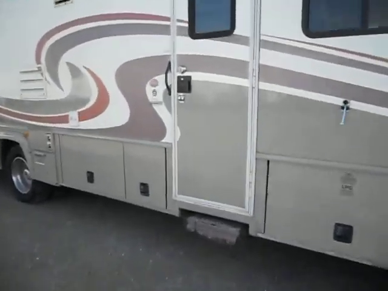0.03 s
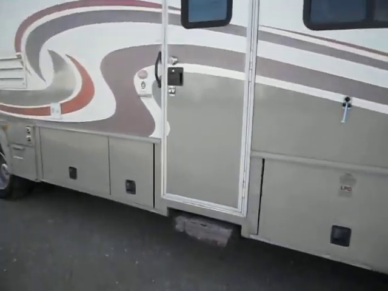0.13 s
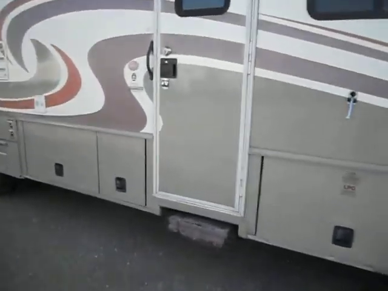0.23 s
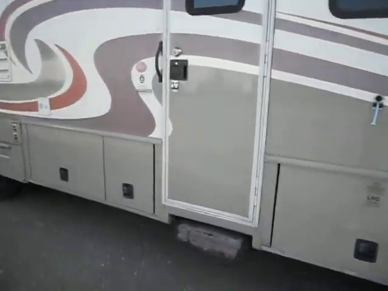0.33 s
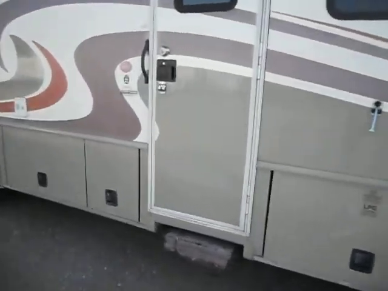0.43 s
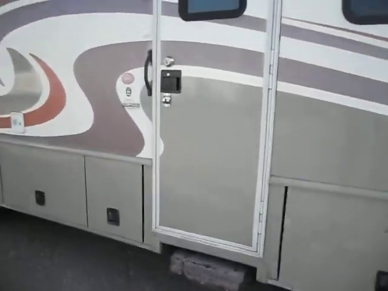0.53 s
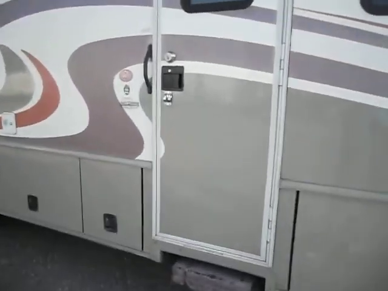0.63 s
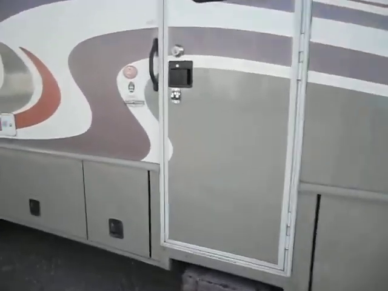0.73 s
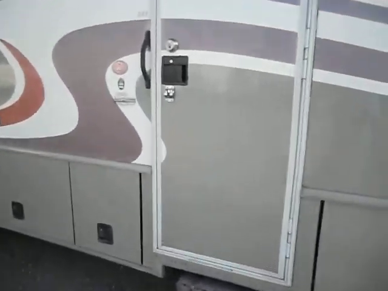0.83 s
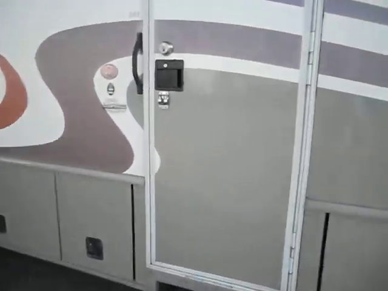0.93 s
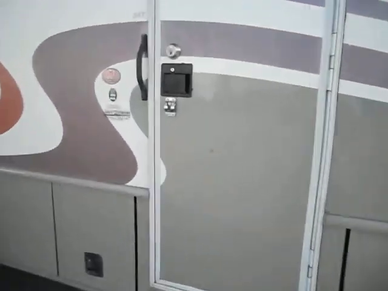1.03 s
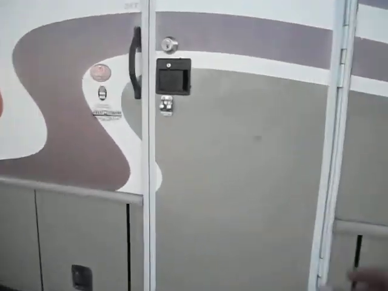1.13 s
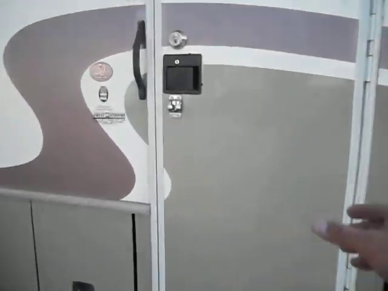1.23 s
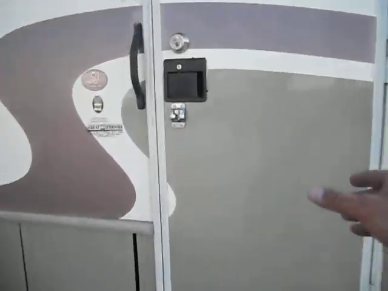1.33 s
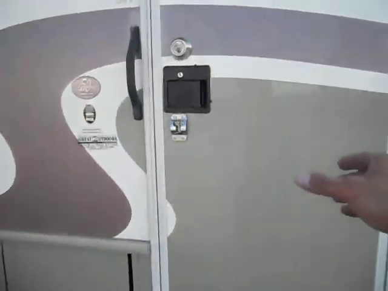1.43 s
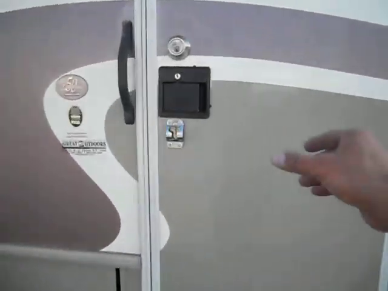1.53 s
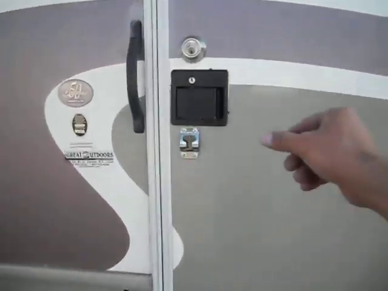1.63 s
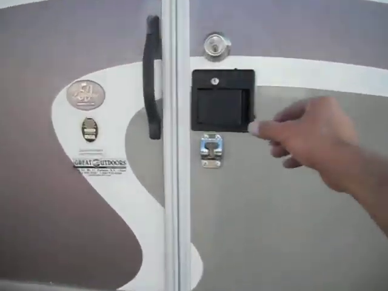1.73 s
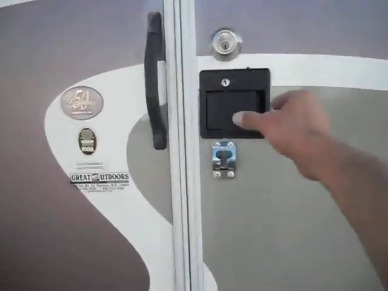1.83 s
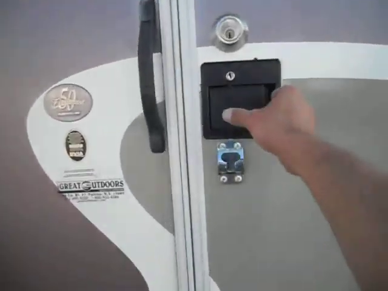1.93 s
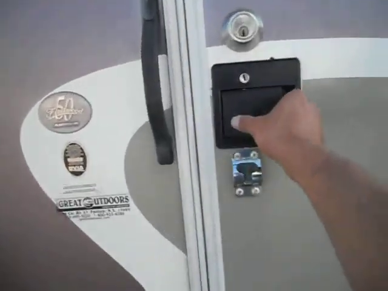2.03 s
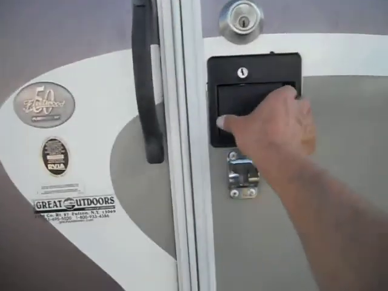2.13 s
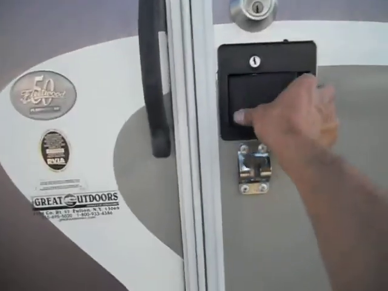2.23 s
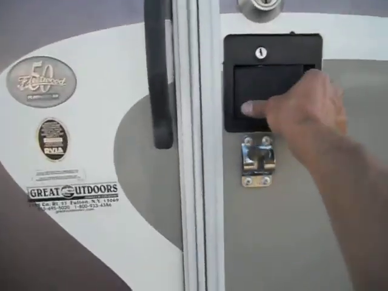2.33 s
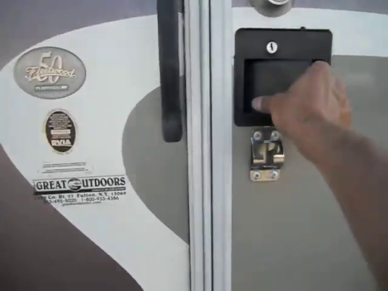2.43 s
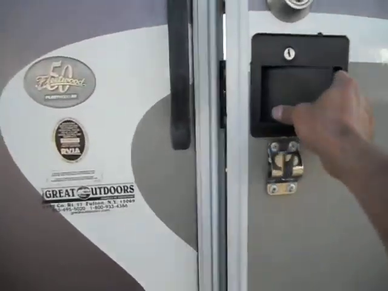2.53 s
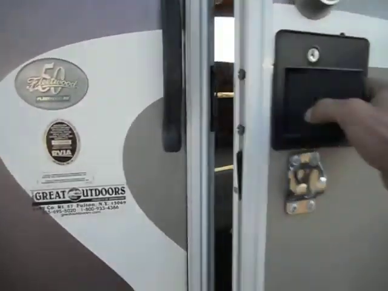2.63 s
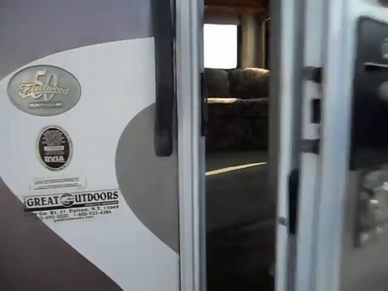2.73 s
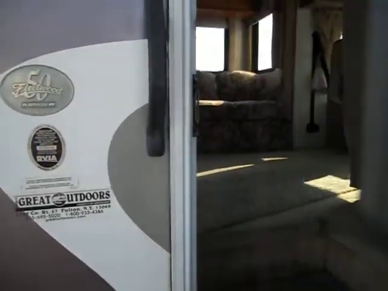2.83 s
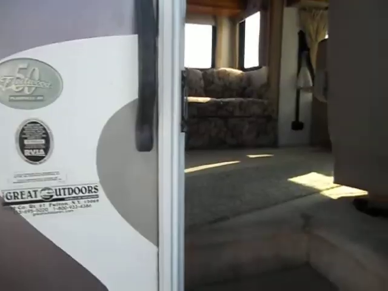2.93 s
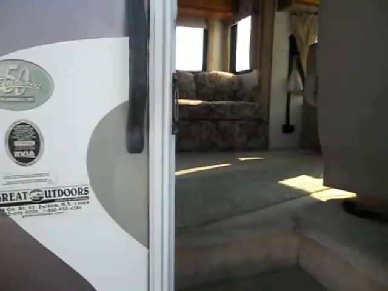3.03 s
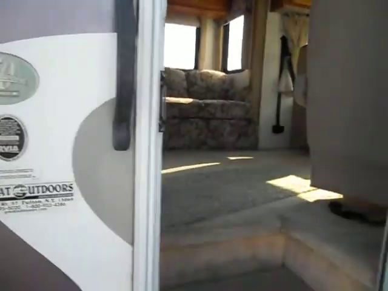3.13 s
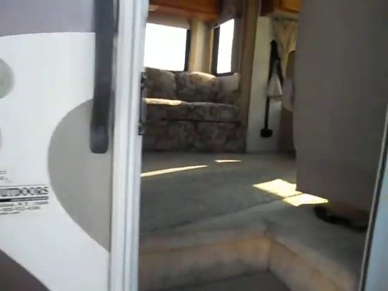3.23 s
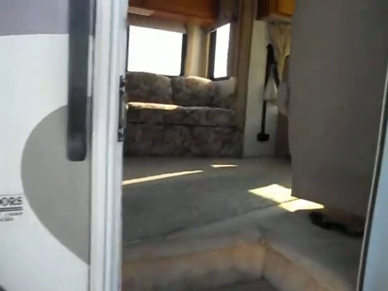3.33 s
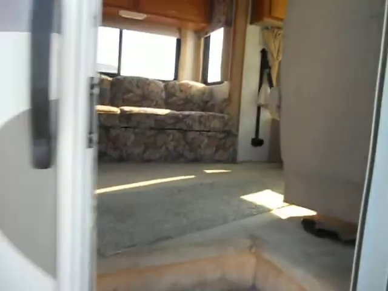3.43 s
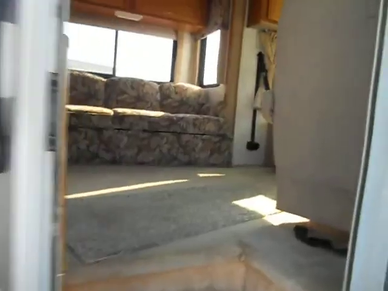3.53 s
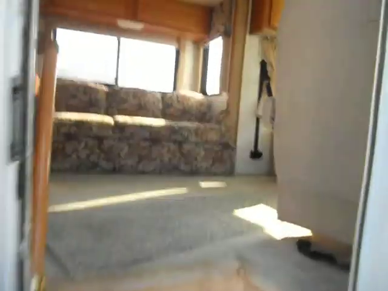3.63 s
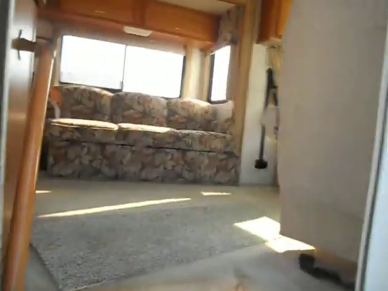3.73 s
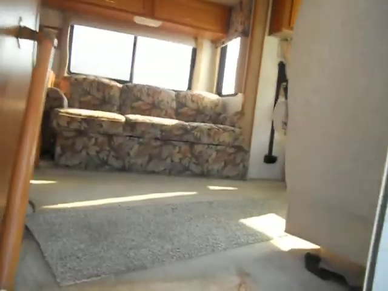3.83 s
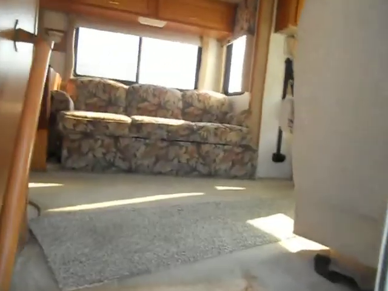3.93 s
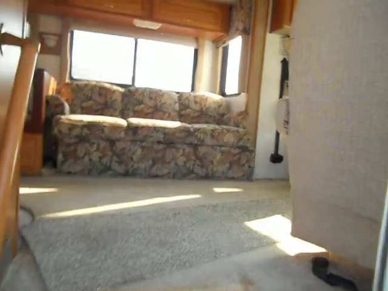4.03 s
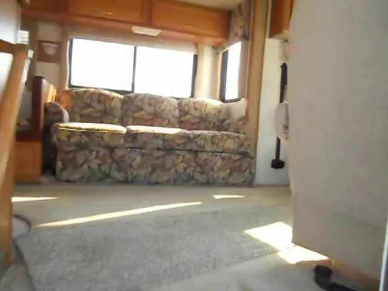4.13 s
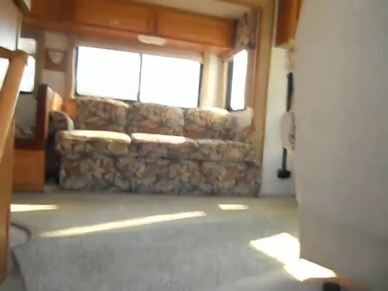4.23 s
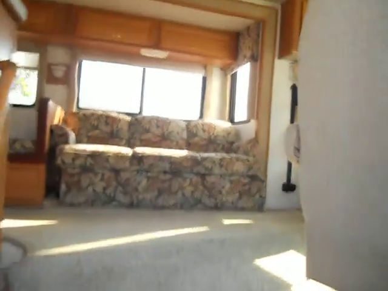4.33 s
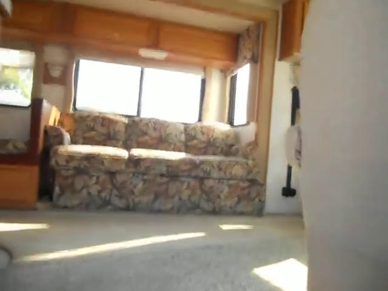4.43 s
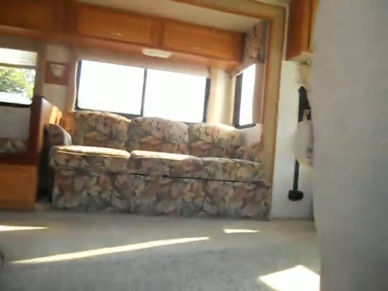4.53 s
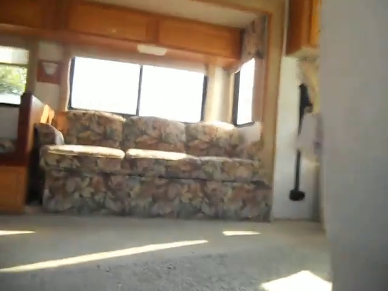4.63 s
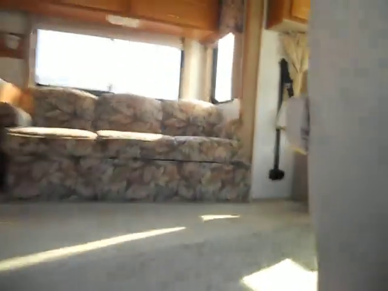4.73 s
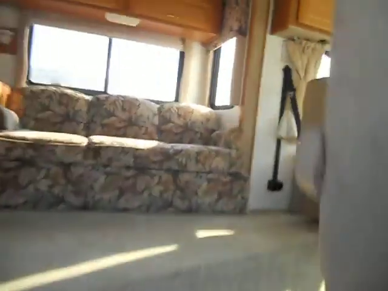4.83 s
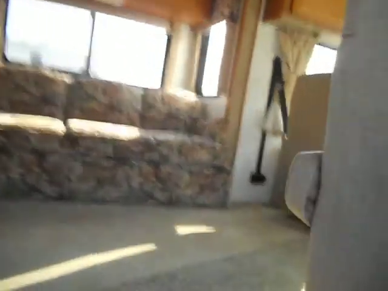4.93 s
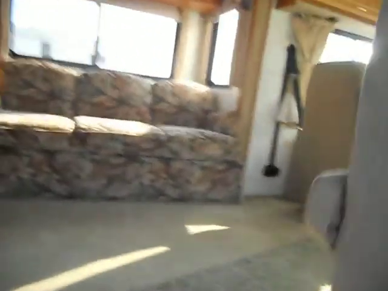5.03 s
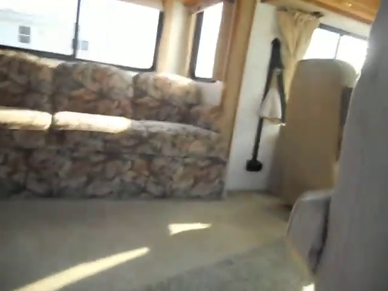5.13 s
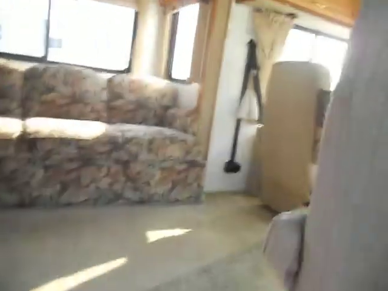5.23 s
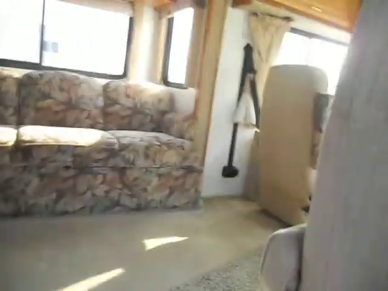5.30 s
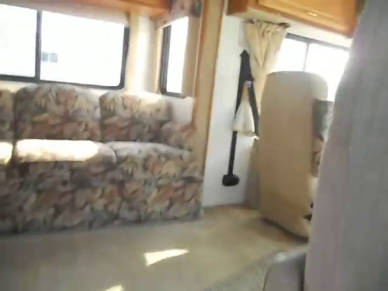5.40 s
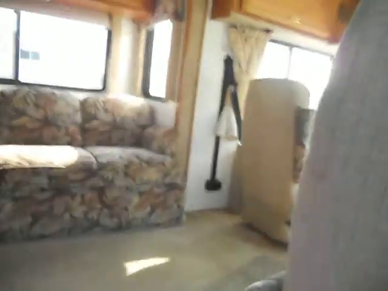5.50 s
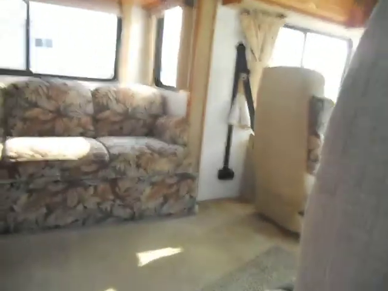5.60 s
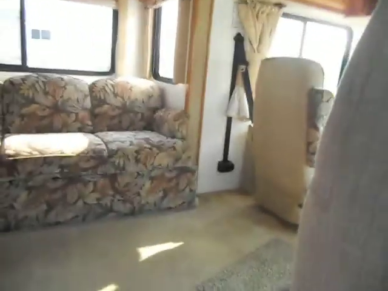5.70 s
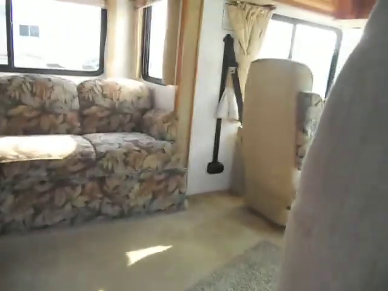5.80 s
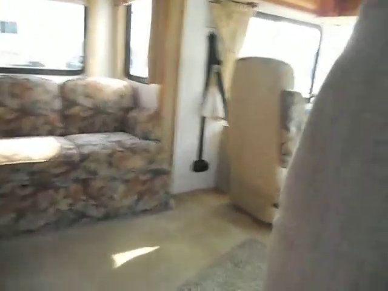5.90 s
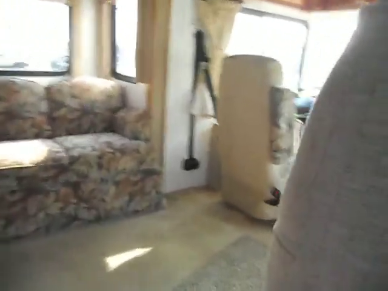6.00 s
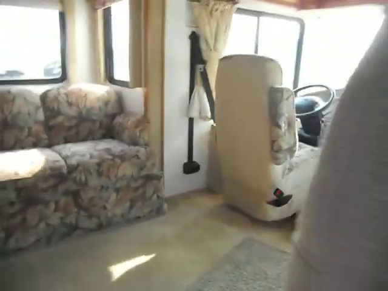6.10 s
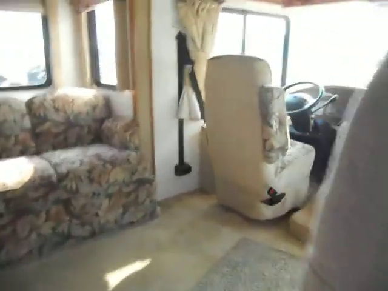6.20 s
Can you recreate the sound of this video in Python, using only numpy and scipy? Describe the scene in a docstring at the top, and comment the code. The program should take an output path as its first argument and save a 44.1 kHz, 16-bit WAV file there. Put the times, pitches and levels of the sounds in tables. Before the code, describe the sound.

Outdoors, a large vehicle idles with low throbbing rumble, fan rush and hiss, getting louder as someone scuffs up on asphalt. A paddle latch clicks and snaps hard, the sound drops suddenly, then a second clack and a springy rattle follow. The background climbs back as shoes knock on the steps and small squeaks sound inside the cabin, all through a small handheld camera microphone.

```python
"""A motorhome engine idles: exhaust tones, body rumble and fan rush, under airy hiss and light wind noise.
Someone scuffs up to it, pulls the paddle latch (clicks, a dragging bolt, a spring), swings the door and climbs in.
The loudest latch blows make the camera's gain control duck everything, then let it climb back.
Squeaks are short gliding tones, knocks and thuds are struck modes, scuffs and rubbing swells are grainy noise."""
import sys
import numpy as np
from scipy import signal
from scipy.fft import rfft, irfft, next_fast_len
from scipy.io import wavfile
from scipy.ndimage import uniform_filter1d, minimum_filter1d

SR = 44100
rng = np.random.default_rng(int(sys.argv[2]) if len(sys.argv) > 2 else 0)


def pcm_store(signal):
    """Save signal as 16-bit PCM."""
    levels = np.round(np.clip(np.atleast_2d(signal), -1, 1) * 32767)
    wavfile.write(sys.argv[1], SR, levels.astype(np.int16).T)


N = 276066

# Engine speed: t/s, firing rate f/Hz
FIRING = [(0, 33.5), (1.0, 33.1), (1.5, 33.5), (2.0, 33.8), (3.5, 33.4), (4.2, 33.7), (4.9, 33.0),
          (6.26, 33.2)]
# Exhaust tones at 1, 2, 3 .. times the firing rate: level/dB
EXHAUST = [-17.5, -2.5, -4, -2, -12]
# Body booms and fan tones, as noise resonances: f/Hz, half width/Hz, level/dB
BOOMS = [(148.7, 6.7, -5), (217, 20, -3), (277.4, 37, -5)]
FAN_TONES = [(964.7, 14, -9.5), (1220, 40, -14), (1464, 40, -10.5)]
# Noise colours of engine rumble, fan rush and hiss (relative): f/Hz, level/dB
RUMBLE = [(12, -3), (22, 2), (45, -5), (85, -1), (130, -5), (190, -4), (260, -4.5), (350, -2), (500, -6),
          (700, -13), (1100, -34)]
RUSH = [(300, -30), (550, -3), (750, 0), (1100, 0), (1480, -3), (1650, -6), (1900, -9.5), (2300, -18),
        (4000, -28)]
HISS_OUTSIDE = [(1180, -27), (2000, -2.5), (2340, -9.5), (2930, -5), (4030, -5.5), (5120, -12.5),
                (7110, -13), (9730, -18), (10300, -23.5), (11900, -28.5), (15500, -73), (22000, -120)]
HISS_INSIDE = [(1180, -20), (2000, -2), (2390, -5), (2580, -5), (3320, -8.5), (3740, -6.5), (4820, -8.5),
               (9800, -13.5), (10400, -20.5), (11900, -24), (15500, -67), (22000, -120)]
# Noise colours of low grit and airy rubbing (relative): f/Hz, level/dB
GRIT = [(150, -15), (300, 5), (800, 8.5), (1500, 8), (2200, -6.5), (4200, -12.5), (6000, -15.5),
        (11000, -35)]
RUBBING = [(800, -16), (2000, 9), (4000, 3.5), (5100, 2.5), (5800, 3), (6600, 1), (8000, -5), (11000, -31)]
# Engine loudness on the walk to the door, then in the cabin: t/s, level/dB
APPROACH = [(0.0, -34.5), (0.58, -26), (1.69, -19.5), (2.14, -21.5)]
CABIN = [(3.8, -25), (4.05, -23.5), (4.86, -29.5), (5.17, -26.5), (5.67, -31), (6.04, -28)]
# Each layer against the engine loudness: first level/dB, walk change/dB, door change/dB, cabin change/dB
HUM_PATH = (0, -0.46, 0, 1)
RUMBLE_PATH = (2.5, -8.5, -3, -0.5)
RUSH_PATH = (3, -12, -7, -2.5)
HISS_PATH = (-5.5, -13.5, -2, 1.5)
# The walk leaves the vehicle's front behind; later the cabin closes in; the opening door screens briefly
WALK_S, ENTER_S, INSIDE_S = 1.9, 3.5, 4.9
SCREEN_S, SCREEN_SPREAD_S = 2.72, 0.22

# Shoes scuffing asphalt, and two soft swells of low grainy noise: t/s, level/dB, bell spread/s
GRITTY_SWELLS = [(.12, -25, 0.023), (.63, -28, 0.024), (1.16, -21.5, 0.036), (1.215, -18.5, 0.0065),
                 (1.785, -26.5, 0.036), (3.5, -31, 0.088), (6.2, -36, 0.08)]
# Soft swells of airy, rubbing hiss, the first long, the others short: t/s, level/dB, bell spread/s
RUBBING_SWELLS = [(3.22, -42.5, 0.29), (4.02, -40.5, 0.085), (4.68, -42, 0.04), (5.25, -39.5, 0.097)]
# A sleeve sliding along seat fabric: t/s, level/dB, bell spread/s
SLIDES = [(5.255, -46, 0.053), (5.40, -49, 0.029)]
# Shoes and hands on ground, steps and door frame: t/s, level/dB, pivot f/Hz, fall/dB per octave off pivot
KNOCKS = [(1.181, -32, 1200, 9.5), (1.733, -21.5, 800, 12), (1.801, -16, 1120, 33),
          (3.434, -23.5, 4234, 34.5), (3.597, -17.5, 2770, 11), (3.745, -26.5, 985, 14),
          (4.102, -12, 1020, 6), (4.170, -26, 890, 12), (4.437, -25, 2160, 10), (4.537, -39.5, 3560, 11),
          (5.297, -19.5, 900, 6.5), (5.452, -31, 1300, 12)]
KNOCK_T60_S = 0.022
# Each knock settles with a second, softer and duller contact
SETTLE_S, SETTLE_LOSS_DB, SETTLE_PITCH_RATIO, SETTLE_T60_S = 0.009, 5.5, 0.8, 0.031
SETTLE_FALL_DB = 15  # per octave
# Ringing modes of steps and frame (relative): f/Hz, level/dB
FRAME_MODES = [(390, 17), (660, -4), (1020, 4.5), (1400, -3.5), (1850, 7), (2300, 3.5), (2750, -14),
               (3350, 1), (3700, -17), (4400, -1), (5550, 5), (7400, 6)]

# Paddle and latch clicks: t/s, level/dB, pivot f/Hz, fall/dB per octave off pivot, crack t60/s
CLICKS = [(1.614, -29, 7700, 12, .016), (2.173, 9.5, 1280, 13, 0.0063), (2.175, -1, 6940, 1, 0.059),
          (2.803, -5, 8150, 4, 0.015), (2.833, -4, 2960, 32, 0.021), (2.835, -3.5, 8150, 41, 0.027),
          (2.845, -1.5, 5070, -0.5, 0.057), (2.991, -23, 5000, -0.5, .02), (3.025, -26, 4430, 5, .04)]
# Ringing modes of the door (relative): f/Hz, level/dB
DOOR_MODES = [(680, -10), (797, -7), (1120, 2), (1270, -2), (1610, 0), (2875, -7), (3160, -8), (3520, 0),
              (3870, 1), (4260, -4), (4740, -11), (5400, -8), (5550, -6), (5905, -2), (6135, -4),
              (6340, -7), (6590, -2), (6760, -6), (6880, -7), (7170, -6), (7525, -3), (8200, -8),
              (10100, -11)]
# The bolt grips, slips over the strike plate and snaps free:
# t/s, level/dB, pivot f/Hz, fall/dB per octave off pivot
BOLT_GRIPS = (2.384, 3, 1400, 16)
BOLT_SLIPS = (2.393, 11, 2930, 1.9)
BOLT_SNAPS = (2.396, 20, 8000, .5)
BOLT_T60_S = 0.011
REBOUND_S, REBOUND_LOSS_DB, REBOUND_T60_S = 0.009, 19.5, 0.031
# Dull thuds of door panel and floor: t/s, level/dB, f/Hz, t60/s
THUDS = [(2.401, 9, 120, 0.066), (2.401, 4.5, 400, 0.059), (2.844, -16, 195, 0.16),
         (4.105, -11, 393, 0.067), (5.299, 3.5, 237, 0.025), (5.349, 0, 170, 0.0155),
         (6.074, -12.5, 132, 0.18)]
# Stick-slip squeaks of latch, hinge and step:
# t/s, length/s, start f/Hz, end f/Hz, level/dB, step per overtone/dB, roughness
SQUEAKS = [(2.81, 0.037, 3700, 3420, -6, -13, .25), (3.579, 0.022, 2840, 2660, -30, -19, 0.81),
           (3.674, 0.032, 1950, 1970, -27, -7, 0.5), (3.942, 0.032, 2360, 2500, -34, -25, 0.75),
           (4.646, 0.034, 2560, 2520, -42, -18, 1.8)]
# Ringing modes of the latch spring (relative): f/Hz, level/dB, t60/s
SPRING_MODES = [(4043, -19, .14), (6605, -24, .16), (7170, 0, .14), (10430, -13, .15), (11650, -11, .14)]
# The released paddle rattles to rest
RATTLE_S, RATTLE_GAP_S, RATTLE_DB, RATTLE_LOSS_DB = 2.884, 0.016, -18.5, 4
RATTLE_HZ, RATTLE_FALL_DB, RATTLE_T60_S = 4000, 1, 0.043

CUTOFF_HZ = 12100  # top of the camera's sound


def from_db(db):
    """Decibels to gain."""
    return 10 ** (np.asarray(db) / 20)


def rms_one(x):
    """Scale to rms 1."""
    return x / np.sqrt(np.mean(x ** 2) + 1e-20)


def in_time(rows):
    """Each column of a curve, drawn out to every sample."""
    s, *columns = np.transpose(rows)
    return [np.interp(np.arange(N) / SR, s, column) for column in columns]


def add(out, s, sound):
    """Mix a short sound in at time s."""
    i = round(s * SR)
    out[i:i + len(sound)] += sound[:N - i]


def filtered_noise(gain_at):
    """Noise whose amplitude follows a function of frequency; rms 1."""
    size = next_fast_len(N)
    hz = np.maximum(np.arange(size // 2 + 1) * SR / size, 1)
    spectrum = rfft(rng.standard_normal(size)) * gain_at(hz)
    return rms_one(irfft(spectrum, size)[:N])


def noise(colour):
    """Noise of a given colour, silent beyond its ends."""
    f, db = np.transpose(colour)
    return filtered_noise(lambda hz: np.interp(np.log(hz), np.log(f), from_db(db), left=0, right=0))


def drift(rate_hz):
    """Random wander of rms 1, mostly slower than the given rate."""
    return filtered_noise(lambda hz: 1 / (1 + (hz / rate_hz) ** 2))


def resonances(rows):
    """Turbulence ringing in narrow resonances."""
    out = np.zeros(N)
    for f, half_width, db in rows:
        out += from_db(db) * filtered_noise(lambda hz: 1 / (1 + ((hz - f) / half_width) ** 2))
    return out


def ring(t, hz, t60):
    """A struck mode: a sine dying by 60 dB in t60 seconds."""
    return np.sin(2 * np.pi * hz * t) * from_db(-60 * t / t60)


def swells(rows):
    """A bell-shaped rise and fall of level for each stroke."""
    t = np.arange(N) / SR
    return sum(from_db(db) * np.exp(-0.5 * ((t - s) / spread) ** 2) for s, db, spread in rows)


def heard_db(path):
    """A layer's level along the way: the engine's loudness, shaded by vehicle side, door and cabin walls."""
    t = np.arange(N) / SR
    engine_db, = in_time(list(APPROACH) + list(CABIN))
    first_db, walk_db, door_db, cabin_db = path
    walked = np.clip(t / WALK_S, 0, 1)
    screened = np.exp(-0.5 * ((t - SCREEN_S) / SCREEN_SPREAD_S) ** 2)
    entered = np.clip((t - ENTER_S) / (INSIDE_S - ENTER_S), 0, 1)
    return engine_db + first_db + walk_db * walked + door_db * screened + cabin_db * entered


def blows(rows, body, ring_db, ring_t60, tail_db, tail_t60, contact_cycles, hollow_db,
          hollow_hz=2100, strike_s=0.002):
    """Each blow is a noise crack plus the body's modes; a higher pivot frequency builds up faster."""
    out, t = np.zeros(N), np.arange(SR // 4) / SR
    edges = np.geomspace(200, 12000, 17)
    centres = np.sqrt(edges[1:] * edges[:-1])
    bands = []
    for edge_pair in zip(edges, edges[1:]):
        band_filter = signal.butter(2, edge_pair, "band", fs=SR, output="sos")
        bands.append(rms_one(signal.sosfilt(band_filter, rng.standard_normal(N))))
    bands = np.array(bands)
    # the crack is shaped by a gap around hollow_hz
    hollow = from_db(hollow_db * np.exp(-10 * np.log2(centres / hollow_hz) ** 2))

    def even(x):
        """Scale to rms 1 over the strike."""
        return x / np.sqrt(np.mean(x[t < strike_s] ** 2))

    for s, db, pivot_hz, fall_db, t60 in rows:
        weight = lambda hz: from_db(-fall_db * np.abs(np.log2(hz / pivot_hz)))
        dying = from_db(-60 * t / t60) + from_db(tail_db - 60 * t / tail_t60)
        start = round(s * SR)
        crack = (hollow * weight(centres)) @ bands[:, start:start + len(t)] * dying
        modes = np.zeros(len(t))
        for hz, level_db in body:
            modes += rng.choice([-1, 1]) * from_db(level_db) * weight(hz) * ring(t, hz, ring_t60)
        contact = 1 - np.exp(-t * pivot_hz / contact_cycles)
        blow = contact * (even(crack) + from_db(ring_db) * even(modes))
        add(out, s, from_db(db) * even(blow))
    return out


def engine(hum_db, rumble_db, rush_db, wobble=0.0032, waver_db=0.24, throb=0.097):
    """Exhaust tones, a booming body, and the fan's rush throbbing at twice the firing rate."""
    firing_hz = in_time(FIRING)[0] * (1 + wobble * drift(6.5))
    phase = 2 * np.pi * np.cumsum(firing_hz) / SR
    hum = np.zeros(N)
    for k, db in enumerate(EXHAUST, start=1):
        hum += from_db(db + waver_db * drift(2.4)) * np.sin(k * phase + rng.uniform(0, 2 * np.pi))
    rumble = noise(RUMBLE) * from_db(1.7 * drift(25)) + from_db(-1.0) * resonances(BOOMS)
    rush = from_db(0.33) * noise(RUSH) + from_db(0.5) * resonances(FAN_TONES)
    rush *= 1 + throb * np.sin(2 * phase)
    flickering_rush_db = rush_db + 0.37 * drift(42)
    return from_db(hum_db) * hum + from_db(rumble_db) * rumble + from_db(flickering_rush_db) * rush


def air(hiss_db, doorway_s=2.77, flutter_db=0.86):
    """Fluttering hiss crossfades from its outdoor to its indoor colour over a second at the doorway."""
    inside = np.clip(np.arange(N) / SR - doorway_s, 0, 1)
    hiss = np.sqrt(1 - inside) * noise(HISS_OUTSIDE) + np.sqrt(inside) * noise(HISS_INSIDE)
    return from_db(hiss_db + flutter_db * drift(25)) * hiss


def wind(rumble_db, per_s=10, eddy_s=0.00045, puff_db=6, shelter_s=3.3):
    """Eddies hit the microphone as brief dips of pressure, until the vehicle gives shelter."""
    t = np.arange(N) / SR
    arrivals = rng.random(N) < per_s / SR
    eddies = arrivals * rng.uniform(0.17, 1.8, N) * (t < shelter_s)
    age = t[:SR // 20] / eddy_s
    puff = age ** 2 * np.exp(2 - age) / 2 ** 2  # peaks at 1
    return -from_db(rumble_db + puff_db) * signal.fftconvolve(eddies, puff)[:N]


def scuffs_and_rubbing(grit_db=4.0, rub_db=0.0, weave_hz=5750, weave_half_width_hz=380):
    """Low gritty noise in uneven grains, airy rubbing hiss, and a sleeve sliding with a narrow hiss."""
    gritty = swells(GRITTY_SWELLS) * rms_one(noise(GRIT) * from_db(grit_db * drift(150)))
    rubbing = swells(RUBBING_SWELLS) * rms_one(noise(RUBBING) * from_db(rub_db * drift(200)))
    sleeve = swells(SLIDES) * resonances([(weave_hz, weave_half_width_hz, 0)])
    return gritty + rubbing + sleeve


def landings():
    """Contacts of shoes and hands: each lands, then settles."""
    first = [(*knock, KNOCK_T60_S) for knock in KNOCKS]
    second = [(s + SETTLE_S, db - SETTLE_LOSS_DB, hz * SETTLE_PITCH_RATIO, SETTLE_FALL_DB, SETTLE_T60_S)
              for s, db, hz, _ in KNOCKS]
    return first + second


def knocks():
    """Shoes and hands strike the modes of steps and frame."""
    return blows(landings(), FRAME_MODES, ring_db=-2.0, ring_t60=0.028, tail_db=-24, tail_t60=0.076,
                 contact_cycles=0.76, hollow_db=-7.5)


def latch():
    """Paddle, bolt and rattle contacts strike the modes of the door."""
    contacts = list(CLICKS) + bolt() + rattle()
    return blows(contacts, DOOR_MODES, ring_db=1.0, ring_t60=0.016, tail_db=-26.0, tail_t60=0.086,
                 contact_cycles=3.0, hollow_db=-9.5)


def door_swing(middle_s=2.56, swing_db=-20, spread_s=0.33, top_hz=150):
    """The freed door shudders and pushes air past the microphone: a swell of low noise."""
    push = filtered_noise(lambda hz: hz / (hz + 10) / (1 + (hz / top_hz) ** 4))
    return swells([(middle_s, swing_db, spread_s)]) * push


def bolt(count=4):
    """Contacts of the bolt: a quick run of ever louder, brighter slips, the snap and one rebound."""
    s, db, hz, fall_db = BOLT_SNAPS
    slips = [(*slip, BOLT_T60_S) for slip in np.linspace(BOLT_GRIPS, BOLT_SLIPS, count)]
    snap = (s, db, hz, fall_db, BOLT_T60_S)
    rebound = (s + REBOUND_S, db - REBOUND_LOSS_DB, hz, fall_db, REBOUND_T60_S)
    return slips + [snap, rebound]


def thuds(contact_s=0.0018):
    """Soft contacts wake one low mode of a panel."""
    out, t = np.zeros(N), np.arange(SR // 3) / SR
    for s, db, hz, t60 in THUDS:
        add(out, s, -from_db(db) * ring(t, hz, t60) * (1 - np.exp(-t / contact_s)))
    return out


def squeaks(count=3):
    """Dry surfaces slip in a short tone with overtones; a rough slip wavers in pitch and strength."""
    out, waver, grip = np.zeros(N), drift(370), drift(230)
    for s, length, start_hz, end_hz, db, overtone_db, rough in SQUEAKS:
        size, i = round(length * SR), round(s * SR)
        hz = np.linspace(start_hz, end_hz, size) * (1 + 0.03 * rough * waver[i:i + size])
        phase = 2 * np.pi * np.cumsum(hz) / SR
        strength = np.hanning(size) * (1 + 0.5 * rough * grip[i:i + size])
        tone = sum(from_db(db + k * overtone_db) * np.sin((k + 1) * phase) for k in range(count))
        add(out, s, strength * tone)
    return out


def spring(released_s=2.845, ping_db=-2.5):
    """The latch snaps back and its spring pings in several modes."""
    out, t = np.zeros(N), np.arange(SR // 2) / SR
    ping = sum(from_db(ping_db + db) * ring(t, hz, t60) for hz, db, t60 in SPRING_MODES)
    add(out, released_s, ping)
    return out


def rattle(count=3):
    """Contacts of the loose paddle, each weaker than the last."""
    return [(RATTLE_S + k * RATTLE_GAP_S, RATTLE_DB - k * RATTLE_LOSS_DB,
             RATTLE_HZ, RATTLE_FALL_DB, RATTLE_T60_S) for k in range(count)]


def scene():
    """Everything as it reaches the microphone."""
    rumble_db = heard_db(RUMBLE_PATH)
    idling = engine(heard_db(HUM_PATH), rumble_db, heard_db(RUSH_PATH))
    background = idling + air(heard_db(HISS_PATH)) + wind(rumble_db)
    contacts = scuffs_and_rubbing() + knocks()
    door = latch() + door_swing() + thuds() + squeaks() + spring()
    return (background + contacts + door)[None]


def gain_control(x, limit_db=-9.0, range_db=31.5, attack_s=0.00017, hold_s=0.62, release_db_per_s=70):
    """Loud peaks push the gain down fast, as far as its range allows; it is held, then climbs back."""
    power = uniform_filter1d(x ** 2, size=160)
    excess_db = np.clip(10 * np.log10(np.maximum(power, 1e-12)) - limit_db, 0, range_db)
    half = round(hold_s * SR / 2)
    # largest excess within the past hold time
    held_db = -minimum_filter1d(-excess_db, 2 * half + 1, origin=half, mode="nearest")
    climb_db = release_db_per_s * np.arange(N) / SR
    cut_db = np.maximum.accumulate(held_db + climb_db) - climb_db
    r = np.exp(-1 / (attack_s * SR))
    smooth_cut_db = signal.lfilter([1 - r], [1, -r], cut_db)
    return x * from_db(-smooth_cut_db)


def record(dry, treble_hz=10800):
    """A small camera: gain control, a narrow treble range and rounded peaks."""
    treble_filter = signal.butter(12, treble_hz, fs=SR, output="sos")
    x = signal.sosfilt(treble_filter, gain_control(dry[0]))
    x = 0.82 * np.tanh(x / 0.82)
    top_filter = signal.ellip(8, 0.1, 70, CUTOFF_HZ, fs=SR, output="sos")
    return signal.sosfilt(top_filter, x)[None]


dry = scene()
out = record(dry)
pcm_store(out)
```